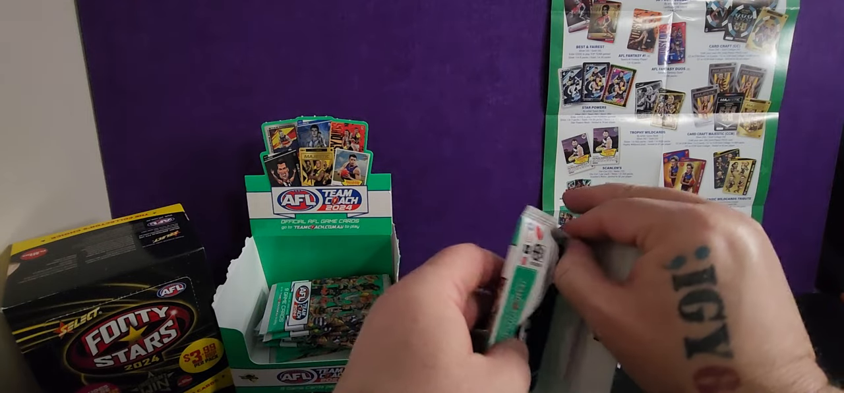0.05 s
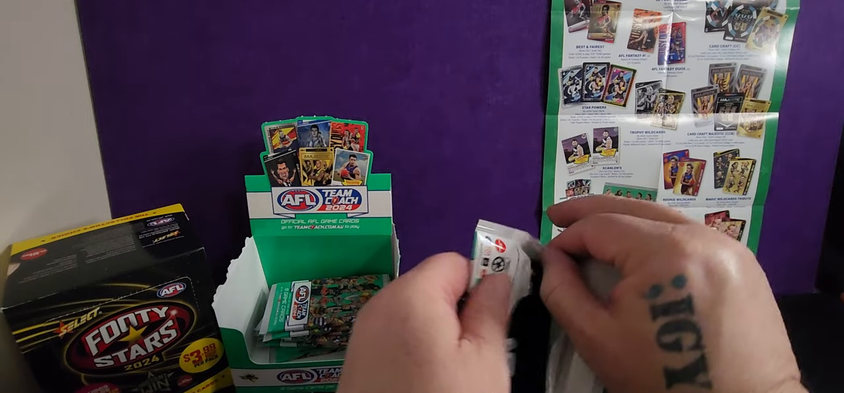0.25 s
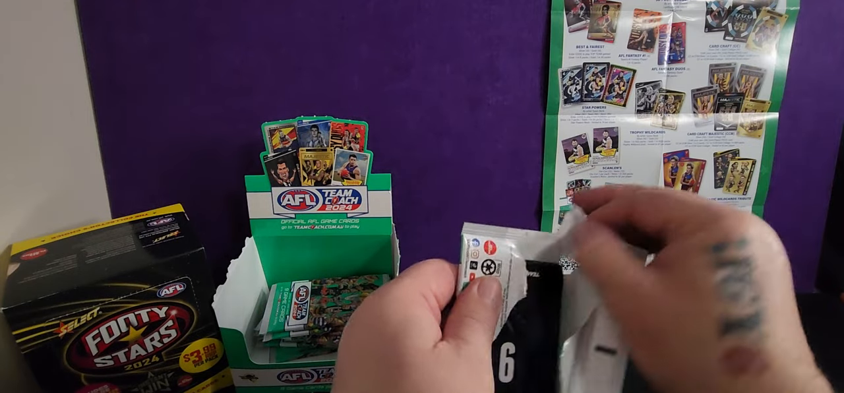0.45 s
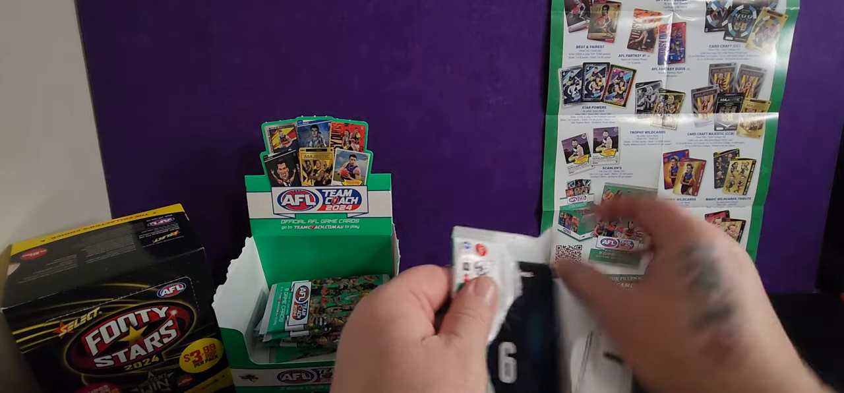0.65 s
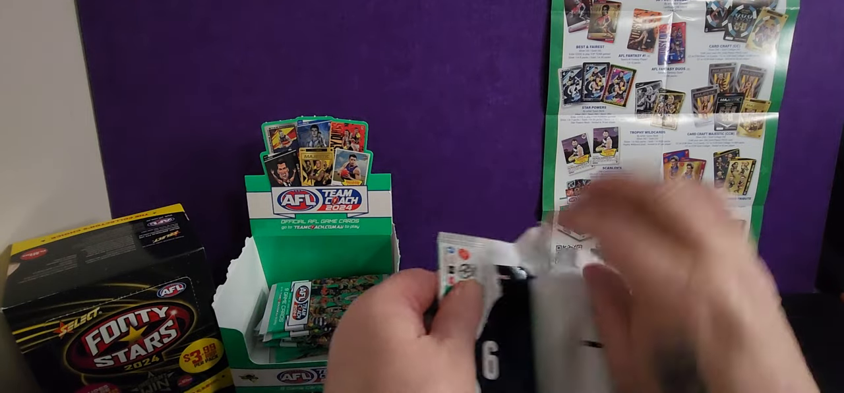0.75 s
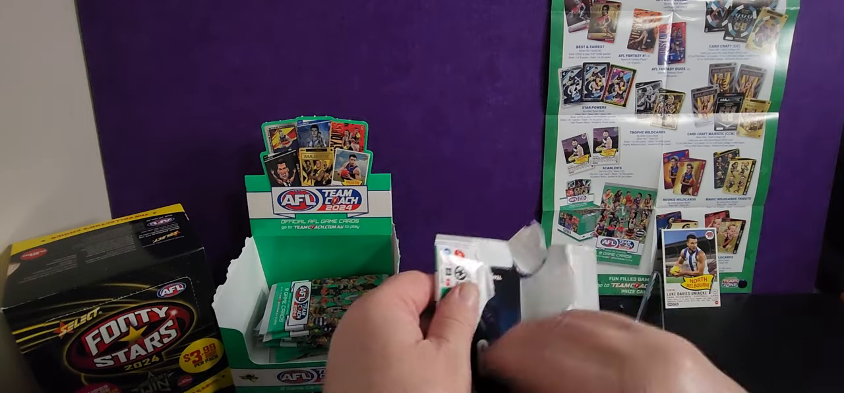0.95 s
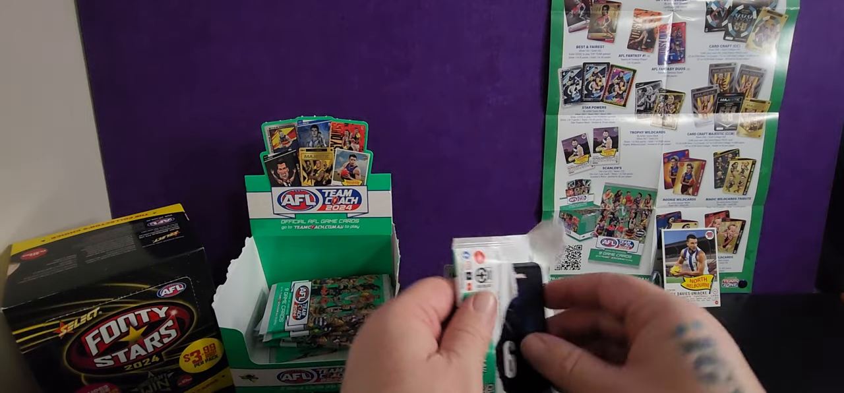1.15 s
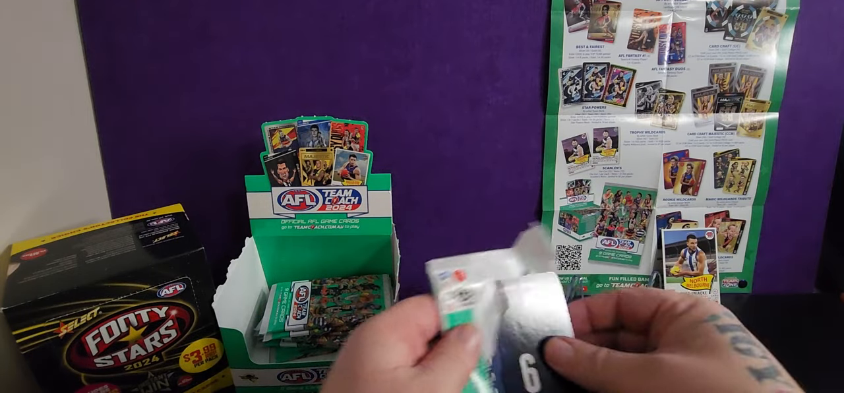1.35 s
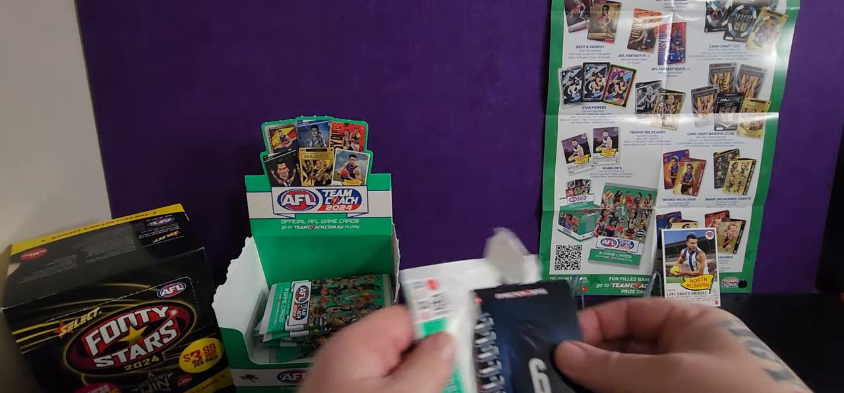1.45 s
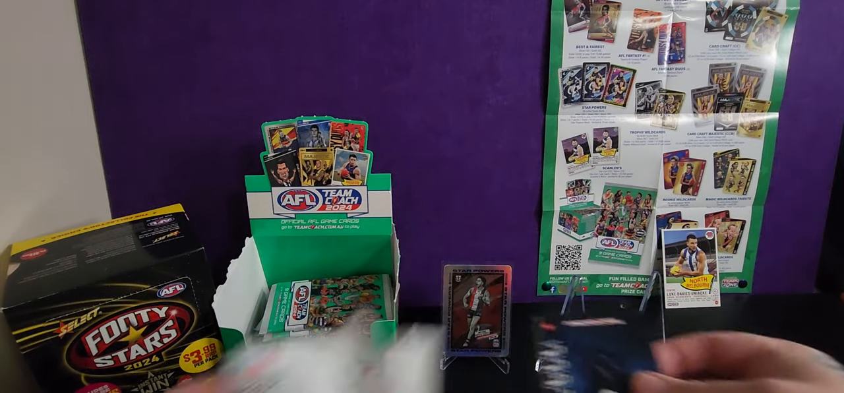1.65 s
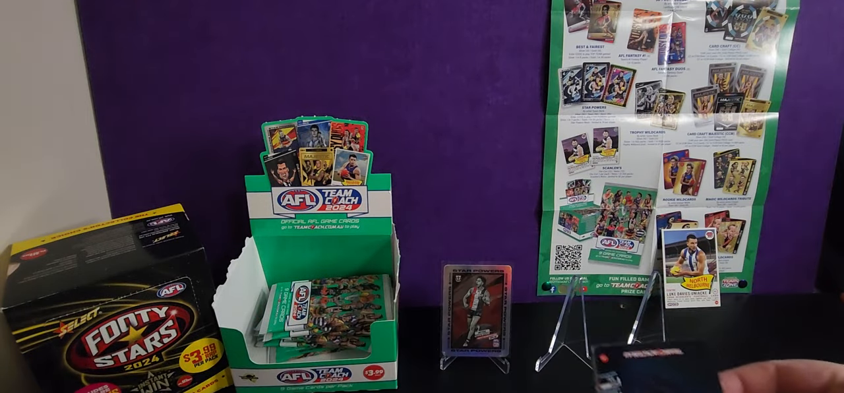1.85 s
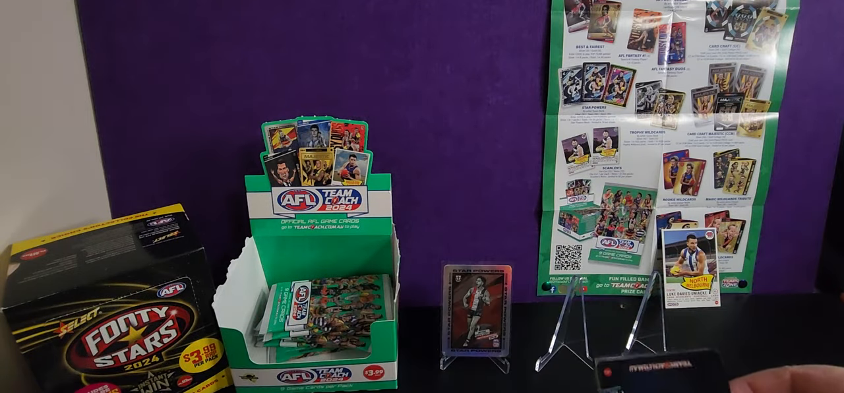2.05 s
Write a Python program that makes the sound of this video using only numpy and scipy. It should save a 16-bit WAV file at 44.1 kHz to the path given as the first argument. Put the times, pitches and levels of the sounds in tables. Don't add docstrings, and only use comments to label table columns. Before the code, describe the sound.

Crisp plastic-foil packet ripping and crinkling close up, followed by light card slides and clicks

```python
import sys
import numpy as np
from scipy import signal
from scipy.io import wavfile
from scipy.ndimage import map_coordinates

SR = 44100
rng = np.random.default_rng(int(sys.argv[2]) if len(sys.argv) > 2 else 0)


def to_linear_factor(level_db):
    exponent = np.asarray(level_db, float) / 20
    return 10 ** exponent


def inscribe(sig):
    pcm = np.round(np.clip(np.atleast_2d(sig).T, -1, 1) * 32767)
    wavfile.write(sys.argv[1], SR, pcm.astype(np.int16))


N = 92610

# frequency in Hz, level in dB.
HUSH_COLOUR = [(12, -32), (20, -6), (65, -11), (293, -23.5), (7520, -35), (16000, -41)]
# frequency in Hz, likeness from 0 to 1.
HUSH_LIKENESS = [(60, 0.75), (500, 0.2), (3000, .1)]
# start in seconds, peak level in dB, pitch in Hz.
THUMPS = [(0.229, -44, 175), (0.372, -51, 119), (0.465, -43, 260), (0.563, -34, 430), (.572, -39, 400),
          (0.649, -50, 200), (0.721, -48, 415), (0.77, -46, 340), (.777, -43.5, 400), (.783, -53, 140),
          (1.148, -34.5, 355), (1.264, -44, 270), (1.342, -48, 360), (1.626, -50, 330), (1.635, -54, 200),
          (1.643, -50, 400), (1.708, -50.5, 143.5), (1.814, -43.5, 603), (2.041, -58, 120), (.24, -58, 70),
          (.488, -49, 130), (.59, -56, 190), (1.3, -56, 250), (1.64, -58, 110), (2.085, -59, 250)]
# time in seconds, level in dB.
SQUEAK_LEVEL = [
    (1.17, -58),
    (1.197, -45),
    (1.243, -43.5),
    (1.266, -48),
]
# frequency in Hz, width in Hz, level in dB.
SQUEAK_BANDS = [(1135, 450, -1), (1750, 350, -4), (3000, 700, -3), (3800, 500, -6), (4350, 350, -3)]
# start in seconds, level in dB, pitch in Hz, length in seconds.
RINGS = [
    (0.837, -41, 620, 0.013),
    (1.236, -40, 4370, 0.021),
    (1.273, -38.5, 619, 0.02),
    (1.226, -43, 1200, .022),
    (1.214, -43, 1000, .01),
    (2.092, -54, 4480, 0.01),
]
# start, fullest moment and end in seconds, level in dB, brightness in steps of
# about 2 dB per octave.
SLIDES = [(-.02, .0, 0.088, -45.5, 1.2), (0.047, 0.139, 0.2, -49.5, 1), (0.162, 0.198, .35, -44.5, 0.3),
          (0.31, 0.36, .37, -48.5, 0.5), (0.55, 0.649, 0.907, -47.5, 0.54),
          (0.675, 0.822, 0.91, -48, -0.14), (.764, .772, .85, -47, 3), (.775, .81, .832, -48, 4),
          (.695, .721, .745, -42, 1.5), (0.999, 1.017, 1.04, -49, -1.3), (1.0, 1.085, 1.13, -52, 0.6),
          (1.092, 1.115, 1.72, -47.5, -0.95), (1.173, 1.289, 1.376, -50, 0.1),
          (1.382, 1.476, 1.607, -42, 1.2), (1.493, 1.587, 1.695, -41.5, 0.98),
          (1.691, 1.695, 1.864, -56, 2.4), (1.73, 1.827, 1.91, -60, 0.6), (1.975, 2.022, 2.2, -48.5, 0.45)]
# frequency in Hz, level in dB.
SLIDE_COLOUR = [(130, -31), (350, -1), (560, -8), (1000, -2), (3000, -2), (16000, -7.5)]
# start in seconds, peak level in
# dB, pitch in Hz, treble share in dB.
SNAPS = [(.001, -34.5, 2730, -25), (0.011, -29.5, 3900, -14), (.02, -32, 3740, -31),
         (.0203, -34, 2200, -30), (.093, -49.5, 5900, -12), (.111, -42, 6200, -7), (0.158, -50, 4160, 0),
         (0.188, -43, 4220, -17), (.197, -41, 4100, 2), (.224, -26, 1120, -10), (.2243, -28, 2800, -12),
         (.23, -27, 820, -20), (.236, -31, 800, -30), (.352, -40, 7700, -10.5), (.371, -26, 6400, -4),
         (0.386, -31.5, 6360, -20), (.429, -19, 3400, -16), (.4405, -23, 2130, -3.5),
         (.451, -17.5, 1520, -12), (0.457, -21, 1490, -22), (.464, -23.5, 1750, -3),
         (.484, -16, 7500, -8.5), (0.513, -17, 3670, -9.5), (.5215, -18, 1900, -13.5),
         (.528, -20, 1620, -13), (.5435, -17, 1390, -17.5), (0.548, -19, 1730, -13),
         (0.555, -22, 1300, -11.5), (.565, -30.5, 1000, -14), (0.5885, -30, 6700, -21.5),
         (.412, -33, 7300, -20), (.418, -29, 5350, -15), (.4215, -29, 1550, -20), (.425, -28, 5200, -12),
         (.4435, -26, 7400, -15), (.4485, -26, 6000, -5), (.4512, -18, 3300, -20), (.467, -27, 4200, -15),
         (.4775, -29, 1550, -25), (.4842, -19, 1500, -20), (.4885, -25, 5000, -8), (.4955, -26, 1300, -5),
         (.5132, -18, 1650, -25), (.5134, -20, 7100, -15), (.532, -25, 1900, -20), (.537, -22, 1950, -20),
         (.5415, -24, 2300, -15), (.5445, -24, 6500, -20), (.562, -27, 2000, -12), (.574, -29, 5700, -15),
         (.6455, -34, 5430, -6), (.718, -36, 7200, -10), (0.7202, -31, 2080, -12),
          (0.7243, -33, 1580, -12), (.7215, -36, 3100, -15), (.7775, -33, 1600, -30), (.78, -35, 1000, -30),
          (.864, -47, 2000, -8), (.8665, -47, 1100, -12), (.828, -31, 2400, -32), (0.8292, -29.5, 770, -24),
          (.8303, -30, 1600, -30), (1.009, -34, 1560, -10), (1.069, -40.5, 860, -12.5),
          (1.114, -52.5, 860, 3), (1.134, -39, 1060, -22), (1.1425, -17, 1185, -39),
          (1.1428, -24.5, 3870, -16), (1.157, -37.5, 6000, -7), (1.2664, -18, 2050, -15),
          (1.2667, -25, 1130, -30), (1.343, -37.5, 2000, -15), (1.514, -42, 1740, -10),
          (1.627, -42, 920, -8), (1.644, -45.5, 1050, -26), (1.662, -45, 1490, -23), (1.707, -39, 826, -10),
          (1.7072, -47, 2500, -6), (1.8, -47, 3030, -15), (1.807, -33, 850, -28), (1.8085, -39, 1400, -25),
          (1.9968, -48, 830, -28), (2.008, -36, 7000, -21), (2.0125, -28, 4530, -14),
          (2.023, -41, 6600, -16)]
# time in seconds, level in dB.
RIP_LEVEL = [(.366, -48.5), (.375, -34), (.408, -38), (.43, -29), (.46, -25.5), (.478, -30), (.495, -26.5),
             (.52, -29), (.55, -25), (.575, -29), (.6, -45)]
# frequency in Hz, level in dB.
RIP_COLOUR = [(80, -38), (200, -7.5), (900, -4.5), (1600, -6), (3500, -5), (16000, -3)]
# frequency in Hz, level in dB.
CAMERA_COLOUR = [(400, 2.5), (540, -4), (800, 1.5), (3000, 1), (6600, .5), (7600, 4.5), (8500, -4.5),
                 (16000, -6.5)]
# time in seconds, left over right in dB.
PAN = [
    (0.0, 2.5),
    (1.89, 4.5),
    (2.1, 11),
]
# frequency in Hz, level in dB.
SPREAD = [(100, -19.5), (700, -18), (2200, -11), (4000, -.5), (16000, 0)]


def evened(x):
    return x / np.sqrt(np.mean(x ** 2) + 1e-20)


def read(points, hz):
    f, value = np.transpose(points)
    return np.interp(np.log(hz + 1), np.log(f + 1), value)


def colour(x, points):
    hz = abs(np.fft.fftfreq(4096, 1 / SR))
    log_gain = np.log(to_linear_factor(np.maximum(read(points, hz), -100)))
    minimum_phase = np.exp(np.conj(signal.hilbert(log_gain)))
    taps = np.fft.ifft(minimum_phase).real[:2048]
    return signal.oaconvolve(x, taps)[:len(x)]


def slow(hz):
    lowpass = signal.butter(2, hz, fs=SR)
    return evened(signal.lfilter(*lowpass, rng.standard_normal(N + SR))[SR:])


def level(curve):
    s, db = np.transpose(curve)
    return to_linear_factor(np.interp(np.arange(N) / SR, s, db, left=-150, right=-150))


def add(mix, s, sound):
    part = mix[max(round(s * SR), 0):][:len(sound)]
    part += sound[:len(part)]


def clicks(per_s, spread_db):
    chance, size, sign = rng.random((N, 3)).T
    hit = chance < per_s / SR
    return hit * to_linear_factor(spread_db * np.minimum(-np.log(size), 4)) * np.sign(sign - .5)


def hush():
    frames, hz = N // 256 + 5, np.fft.rfftfreq(1024, 1 / SR)
    a, b, c, d = rng.standard_normal((frames, 513, 4)).T
    same = np.clip(read(HUSH_LIKENESS, hz), -1, 1)[:, None]
    left = a + 1j * b
    right = same * left + np.sqrt(1 - same ** 2) * (c + 1j * d)
    spectrum = np.array([left, right]) * to_linear_factor(read(HUSH_COLOUR, hz))[:, None]
    noise = evened(signal.istft(spectrum, nperseg=1024, noverlap=768)[1][:, :N])
    return to_linear_factor(-65.5) * noise * to_linear_factor([[1], [-1]])


def rumble():
    rumble_hz, drone_hz, early_db, settle_s = 56.6, 49.5, 8, 0.3
    t = np.arange(N) / SR
    band = signal.butter(2, [rumble_hz * 0.49, rumble_hz * 2.32], "band", fs=SR)
    low = evened(signal.lfilter(*band, rng.standard_normal(N))) * to_linear_factor(-66 + 2.5 * slow(15.0))
    drone = to_linear_factor(-72 + 3 * slow(8)) * np.sin(2 * np.pi * drone_hz * t + .8 * slow(5))
    settling = to_linear_factor(early_db * np.exp(-(t / settle_s) ** 2))
    return (low + drone) * settling * to_linear_factor([[1.5], [-1.5]])


def thumps():
    cycles, rough_share = 1.66, .75
    out, t = np.zeros(N), np.arange(3000) / SR
    for s, db, hz in THUMPS:
        u = t * hz / cycles
        fade = np.exp(-2 * u)
        band = signal.butter(2, [hz * 0.65, hz * 1.3], "band", fs=SR)
        rough = evened(signal.lfilter(*band, rng.standard_normal(len(t)))) * fade
        tone = np.sin(2 * np.pi * hz * t) * fade
        add(out, s, to_linear_factor(db) * 5.24 * u * (tone + rough_share * rough))
    return out


def squeak():
    drive, out = clicks(6000, 1.2), np.zeros(N)
    for hz, width, db in SQUEAK_BANDS:
        band = signal.iirpeak(hz, hz / width, fs=SR)
        resonance = evened(signal.lfilter(*band, signal.lfilter(*band, drive)))
        out += to_linear_factor(db + 2.4 * slow(70)) * resonance
    return evened(out) * level(SQUEAK_LEVEL)


def rings():
    out = np.zeros(N)
    for s, db, hz, length in RINGS:
        t = np.arange(0, length, 1 / SR)
        wobble = .5 * slow(50)[:len(t)]
        swell = np.sin(np.pi * np.sqrt(t / length))
        tone = np.sin(2 * np.pi * hz * t + wobble) * (1 + .3 * np.sin(3 * wobble))
        add(out, s, to_linear_factor(db) * swell * tone)
    return out


def slides():
    grains_per_s, foot_db = 9800, -27
    grain = colour(clicks(grains_per_s, 0), SLIDE_COLOUR) * to_linear_factor(.7 * slow(65))
    t, out = np.arange(N) / SR, np.zeros(N)
    for start, full, end, db, tilt_db in SLIDES:
        on = slice(max(round(start * SR), 0), round(end * SR))
        u = np.interp(t[on], [start, full, end], [1, 0, 1])
        tilted = evened(colour(grain[on], [(300, -3 * tilt_db), (16000, 8.1 * tilt_db)]))
        out[on] += to_linear_factor(db + foot_db * u ** 1.21) * np.sqrt(1 - u ** 4) * tilted
    return out


def snaps():
    cycles, lag_s, rise_s = 1.9, 0.001348, 0.00061
    tick_s, rattle_s, rattle_db, treble_lift_db = 0.0012, 0.0038, -11, 5
    out, t = np.zeros(N), np.arange(1200) / SR
    treble = signal.butter(1, [4000, 14000], "band", fs=SR)
    after = np.maximum(t - lag_s, 0)
    build = np.exp(np.minimum(t - lag_s, 0) / rise_s)
    tick = np.exp(-after / tick_s)
    tail = np.exp(-(after / rattle_s) ** 2)
    for s, db, hz, treble_db in SNAPS:
        a, b = rng.standard_normal((len(t), 2)).T
        ring = np.cos(2 * np.pi * hz * (t - lag_s)) * np.exp(-after * hz * 2 / cycles)
        band = signal.butter(1, [hz * 0.31, min(hz * 1.69, 9000)], "band", fs=SR)
        rattle = evened(signal.lfilter(*band, a)) * (0.12 * tick + to_linear_factor(rattle_db) * tail)
        fizz = evened(signal.lfilter(*treble, b)) * (tick + 0.17 * tail)
        lowpass = signal.butter(2, min(hz * 4.64, 15000), fs=SR)
        body = signal.lfilter(*lowpass, build * (ring + rattle))
        add(out, s, to_linear_factor(db) * (body + to_linear_factor(treble_db + treble_lift_db) * build * fizz))
    return out


def rip():
    slips_per_s, spread_db, patch_db, fizz_db, clump_db, trim_db = 8000, 2.5, 3, -2, 1, -0.5
    t, out = np.arange(300) / SR, np.zeros(N)
    train = clicks(slips_per_s, spread_db)
    patch = rng.integers(0, 24, N)
    swell = [to_linear_factor(patch_db * slow(40)) for _ in range(6)]
    for k, hz in enumerate(np.geomspace(400, 15000, 24)):
        cycles = 1.3 * np.sqrt(hz / 1000)
        tap = np.sin(2 * np.pi * hz * t) * np.exp(-t * hz / cycles)
        tap = tap / np.linalg.norm(tap) * (hz / 1000) ** .55
        out += signal.oaconvolve(train * (patch == k), tap)[:N] * swell[k // 4]
    out = evened(out) + to_linear_factor(fizz_db) * rng.standard_normal(N)
    out = evened(colour(out, RIP_COLOUR) * to_linear_factor(clump_db * slow(200)))
    return out * level(RIP_LEVEL) * to_linear_factor(trim_db)


def ports(x):
    tail_db, tail_t60_s = -19, .08
    lead_s_per_db, level_pan_db = 3.6e-05, 2.8
    z = signal.stft(x, nperseg=96)[2]
    scatter = np.exp(2j * np.pi * rng.random(z.shape[::-1]).T)
    side = colour(signal.istft(z * scatter, nperseg=96)[1][:N], SPREAD)
    t = np.arange(8000) / SR
    a, b = rng.standard_normal((len(t), 2)).T
    tail = np.array([a, 2.4 * a + .5 * b]) * to_linear_factor(-60 * t / tail_t60_s) * np.minimum(t / 0.012, 1)
    wet = signal.fftconvolve(x[None], tail / np.linalg.norm(tail[0]), axes=1)[:, :N]
    s, pan_db = np.transpose(PAN)
    half = np.interp(np.arange(N) / SR, s, pan_db) / 2
    late = np.arange(N) - np.maximum(2 * half - level_pan_db, 0) * lead_s_per_db * SR
    right = map_coordinates(x - side, [late], order=5)
    return np.array([x + side, right]) * to_linear_factor([half, -half]) + to_linear_factor(tail_db) * wet


def scene():
    wrapper = thumps() + squeak() + rings() + slides() + snaps() + rip()
    return ports(colour(wrapper, CAMERA_COLOUR)) + hush() + rumble()


def low_pass(x):
    return signal.sosfilt(signal.butter(12, 16990, fs=SR, output="sos"), x)


def record(dry):
    edge = signal.firwin(511, 15900, window=("kaiser", 9), fs=SR)
    mix = signal.oaconvolve(dry, edge[None], "same") + to_linear_factor(-40) * dry
    return low_pass(mix)


dry = scene()
out = record(dry)
inscribe(out)
```